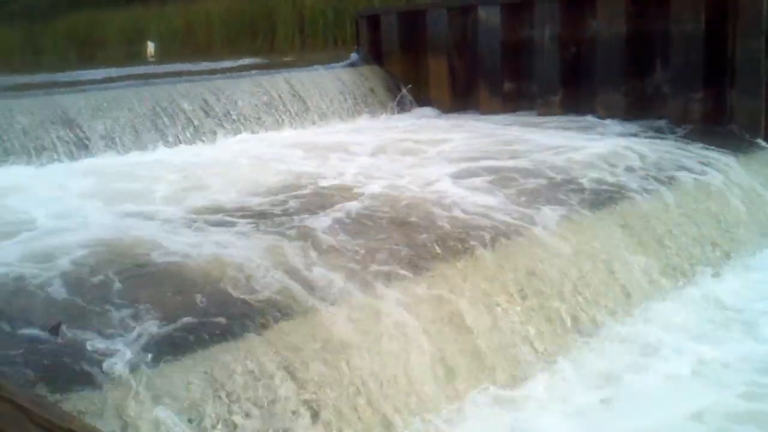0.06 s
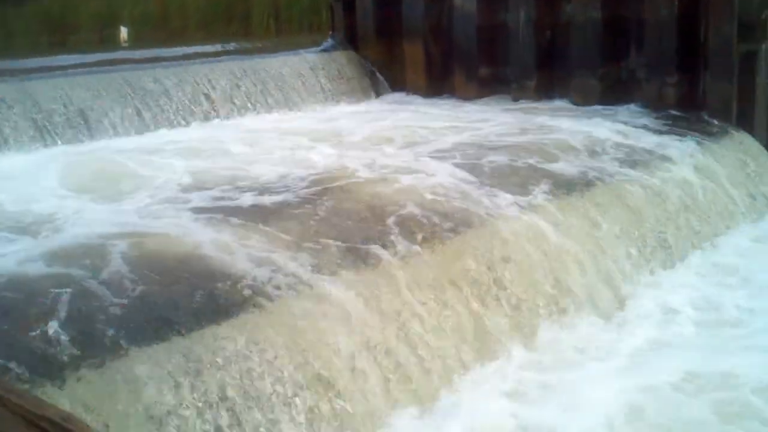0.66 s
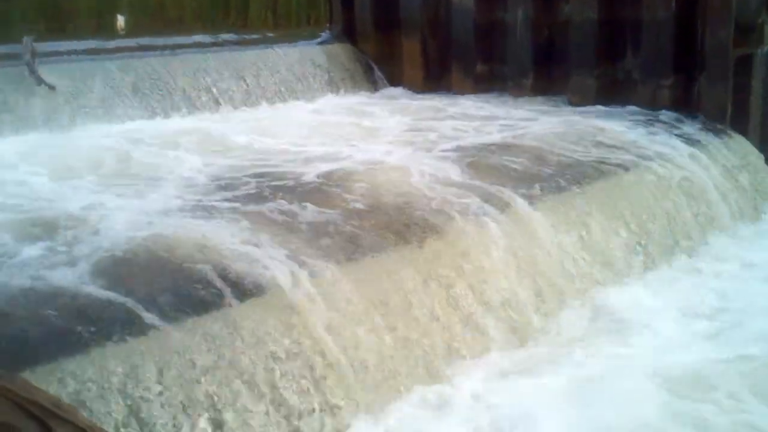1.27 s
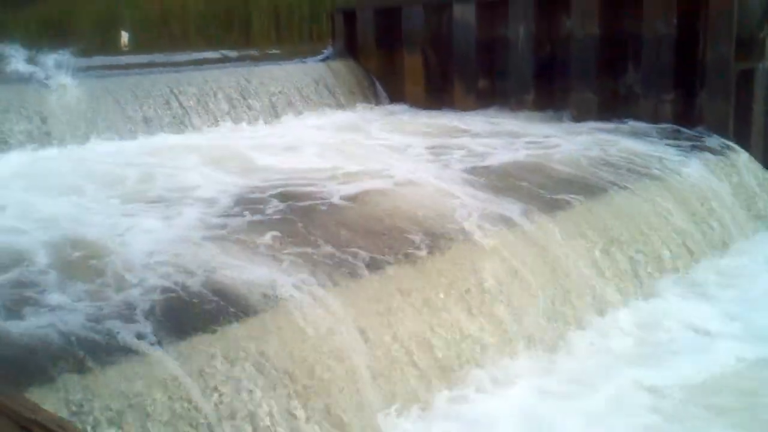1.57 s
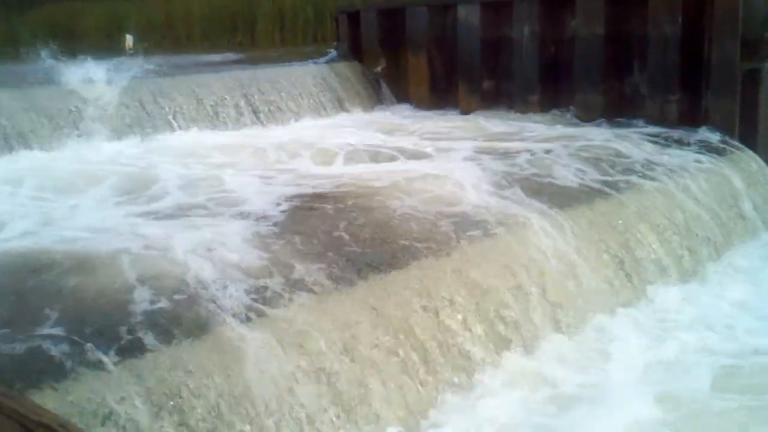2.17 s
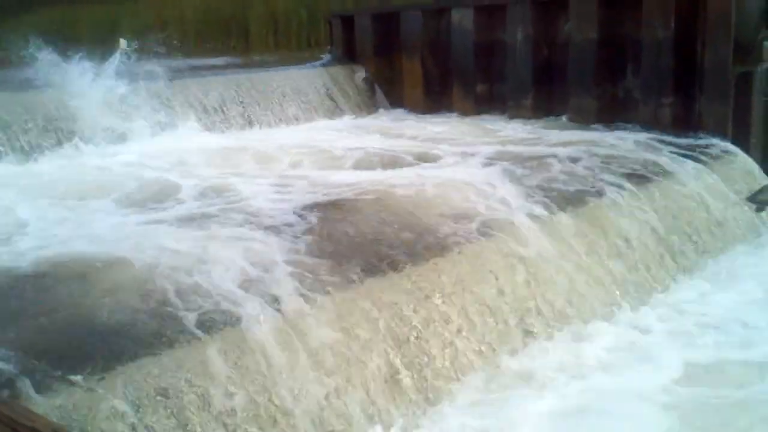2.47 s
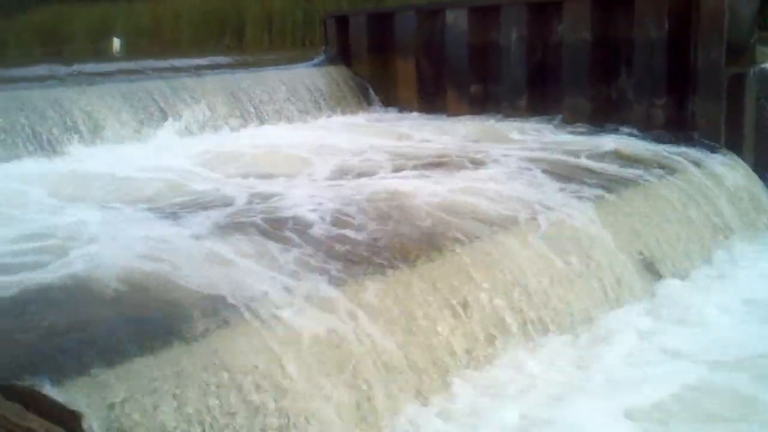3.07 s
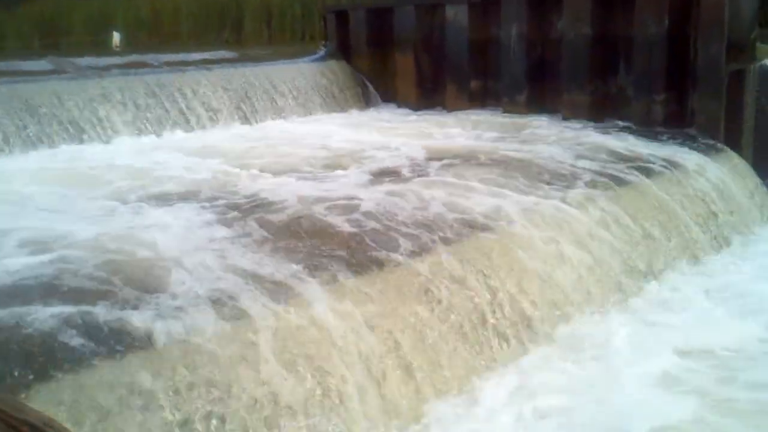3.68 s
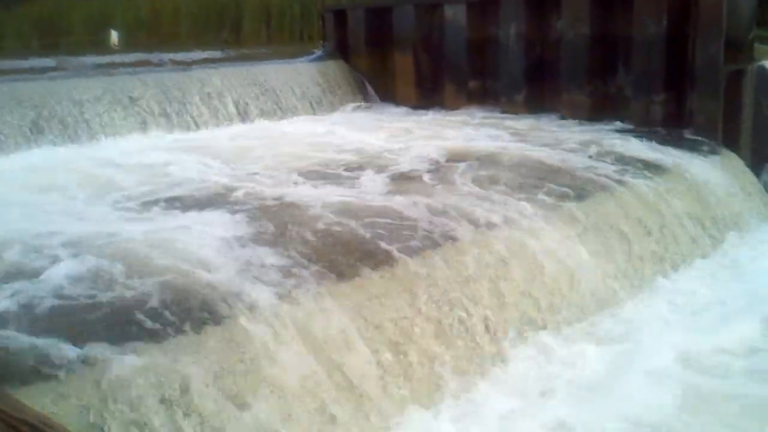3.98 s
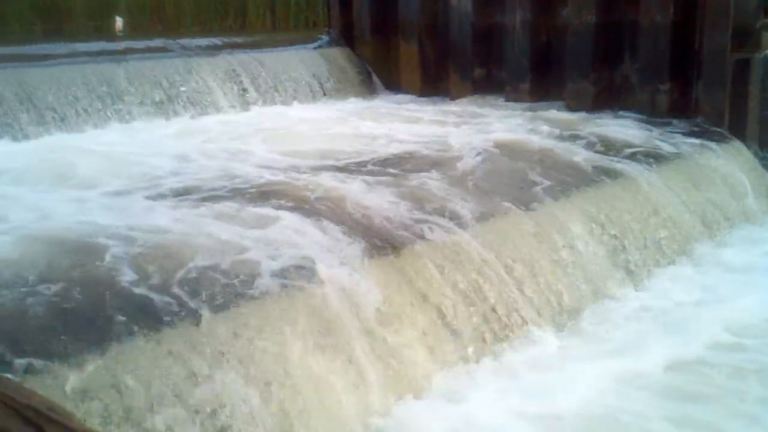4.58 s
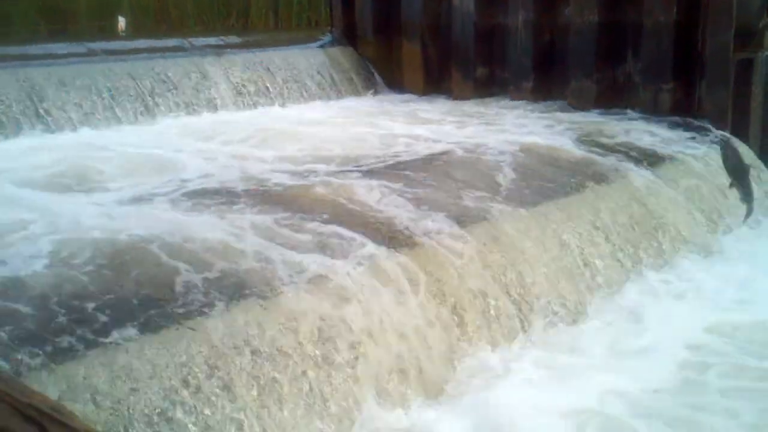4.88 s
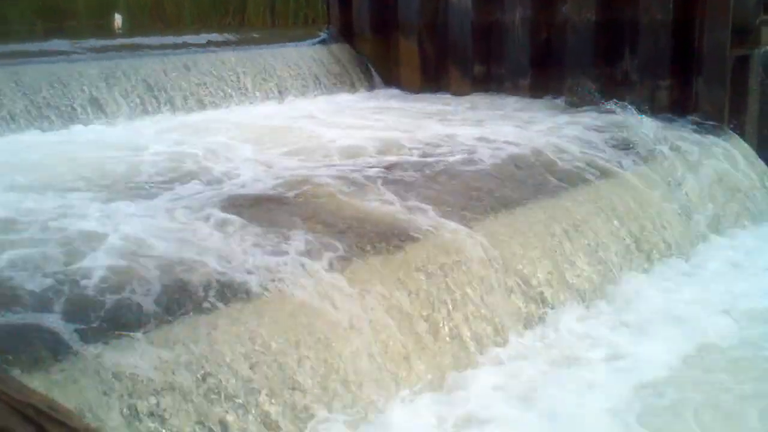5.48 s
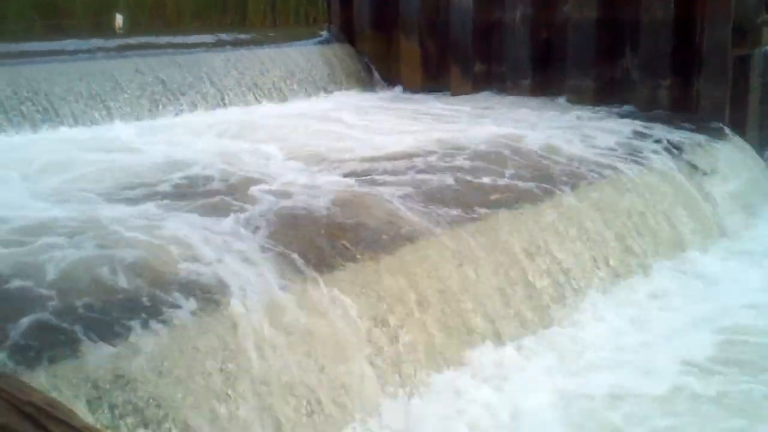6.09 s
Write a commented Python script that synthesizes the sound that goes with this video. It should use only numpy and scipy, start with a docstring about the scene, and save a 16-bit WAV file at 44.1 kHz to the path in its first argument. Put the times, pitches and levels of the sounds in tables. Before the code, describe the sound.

A river pours over a low stepped weir and plunges into a pool a few metres away. A deep, churning roar runs steadily throughout, with babbling bubbles and the hiss of spray above it. Low hollow gulps of air, a few faint plops and small wet slaps come and go inside the rush. The outdoor sound is wide and slightly hollow, picked up by a handheld microphone.

```python
"""White water below a low weir

A river pours over a stepped weir and plunges into a pool a few metres from the microphone.
Clouds of trapped air roar, single bubbles ring, spray fizzes and now and then a slab of water slaps down.
The microphone is a handheld camera's, and its stereo widener gives the rush a hollow colour."""
import sys
import numpy as np
from scipy import signal
from scipy.fft import rfft, irfft
from scipy.io import wavfile
from scipy.ndimage import uniform_filter1d, map_coordinates

SR = 44100
rng = np.random.default_rng(int(sys.argv[2]) if len(sys.argv) > 2 else 0)


def transcribe(u):
    """Save the signal u as a 16-bit wav file named by the first command-line argument.

    u: samples, shape (n,) or (channels, n), limited to [-1, 1]; the rate is SR.
    q: integer samples, one column per channel.
    """
    v = np.clip(np.atleast_2d(u).T, -1, 1)
    q = np.round(v * 32767).astype(np.int16)
    wavfile.write(sys.argv[1], SR, q)


N = 279153
TIME = np.arange(N) / SR
FREQ = np.maximum(np.arange(N // 2 + 1) * SR / N, 1)


# Spectrum of the plunge pool, a few metres off (frequency [Hz], relative level [dB])
POOL_SPECTRUM = [(25, -36.2), (50, -33), (80, -18.5), (120, -9.5), (165, -4.9), (215, -5), (280, -0.95),
                 (360, -1.57), (430, -4.5), (560, -9.5), (780, -16.5), (1100, -21), (1500, -24.5),
                 (2100, -24.5)]
# The boil under the fall, surging at its own pace (time [s], level [dB])
BOIL_SURGES = [(0, -0.6), (0.88, -0.5), (1.15, 1.1), (1.37, 1.0), (1.5, -1), (1.72, 1.2), (1.95, -1.2),
               (2.12, 0.8), (2.27, -2.0), (2.38, 1.2), (2.85, -0.5), (3.22, -2), (3.95, -0.7), (4.25, -0.1),
               (4.85, -0.4), (5.34, 0), (5.52, -2), (5.75, -0.5), (6.33, -0.5)]

def plunge():
    """Big pockets of air, driven under by the fall, boom and gurgle."""
    cloud = bubbles(199.3, 750.5, cycles=33.5, spread_db=1.5, rise=0.067, count=1600)
    water = churn(cloud, share_db=-4.5, flutter_db=0, flutter_hz=14)
    roar = spread(colour(water, gains(POOL_SPECTRUM) * below(700)))
    rumble = steady(colour(roar, below(200)), span_s=0.24)
    boil = steady(colour(roar, above(225)), span_s=0.12) * swell(BOIL_SURGES)
    return (rumble + boil) * undb(-0.52)


def splashing():
    """Smaller bubbles babble where the sheet of water breaks up."""
    cloud = bubbles(648.6, 2490, cycles=102, spread_db=3, rise=0.046, count=2300)
    water = churn(cloud, share_db=-6.5, flutter_db=0.5, flutter_hz=9.2)
    babble = spread(colour(water, gains(POOL_SPECTRUM) * above(663) * below(2320, order=24)))
    return steady(babble, span_s=0.2) * flow() * undb(-0.78)


# Spray and bursting foam across the weir (frequency [Hz], relative level [dB])
SPRAY_SPECTRUM = [(2900, -27), (3500, -31.5), (4400, -30.5), (5200, -31.5), (5850, -30), (6600, -31),
                  (7800, -30), (8600, -28.5), (10000, -27), (11000, -27.5), (12000, -31.5), (13600, -33)]
# Thrown spray coming down on the pool (time [s], length [s], patter rise [dB], fizz rise [dB])
SPRAY_SHOWERS = [(.58, 0.15, 1.5, 0.2), (0.793, .07, 4, 1), (1.82, .05, 1.5, 0.5), (2.08, .06, 0, 1.2),
                 (2.685, .08, 1.2, 0.5), (2.785, .04, 1.0, 0.3), (2.88, .09, 0.3, 0.5),
                 (3.52, .14, -0.5, 1), (3.675, 0.05, 2, 1.5), (4.172, .06, 0.6, 1.2), (4.577, .07, 1.7, 0),
                 (4.788, .05, 1, 0.9), (4.982, 0.044, 2, 1), (5.395, .04, -0.4, 2), (5.574, 0.036, 2, 0),
                 (5.69, .12, 0.2, 2), (6.1, .06, 1.5, 1.5)]

def spray(split_hz=9800):
    """Drops patter and foam fizzes, lifting with the showers; coarse and fine foam flutter apart."""
    drops = bubbles(2388, 5047, cycles=400, spread_db=2.8, rise=0.044, count=3600)
    foam = bubbles(5140, 14400, cycles=30, spread_db=2, rise=0.1, count=24000)
    hiss = gains(SPRAY_SPECTRUM) * above(2110, order=24)
    patter = colour(churn(drops, share_db=-4, flutter_db=0.52, flutter_hz=20), hiss * below(5680))
    fizz = patter_db = fizz_db = 0
    for cloud, band in ((foam, below(split_hz)), (np.roll(foam, N // 2, axis=1), above(split_hz))):
        froth = churn(cloud, share_db=-5, flutter_db=1, flutter_hz=23)
        fizz += colour(froth, hiss * above(6190) * band)
    for at, length, patter_rise, fizz_rise in SPRAY_SHOWERS:
        shower = np.exp(-(2 * (TIME - at) / length) ** 2)
        patter_db += patter_rise * shower
        fizz_db += fizz_rise * shower
    patter = steady(spread(patter), span_s=0.15) * undb(patter_db)
    fizz = steady(spread(fizz), span_s=0.14) * undb(fizz_db)
    return (patter + fizz) * flow() * undb(-0.56)


# Air gulped under the fall, straight ahead (time [s], relative level [dB], pitch [Hz])
AIR_GULPS = [(.08, -25, 307), (1.0, -19, 274), (1.12, -20, 421), (1.25, -26, 300), (1.335, -24, 425),
             (2.083, -21, 445), (2.796, -21.5, 347), (2.92, -23, 302), (3.37, -22, 412), (3.85, -26, 423),
             (4.18, -26, 426), (4.345, -21.5, 420), (4.385, -23, 273), (4.582, -31, 665), (5.005, -20, 318),
             (5.32, -21, 426), (5.735, -22, 414), (6.166, -24, 287)]

def gulps():
    """The biggest pockets of air ring low and hollow."""
    return undb(2) * rings(AIR_GULPS, attack_s=0.013, decay_s=0.029, rise_per_s=0.14, waver=0.013)


# Single bubbles close to the microphone, on the left (time [s], relative level [dB], pitch [Hz])
NEAR_PLOPS = [(1.091, -31, 2255), (1.752, -31, 1783), (2.361, -33, 2330), (2.675, -29, 2260),
              (3.55, -27.5, 1865)]

def plops():
    """Small bubbles ring high and short."""
    ringing = rings(NEAR_PLOPS, attack_s=0.004, decay_s=0.014, rise_per_s=0.27, waver=0.005)
    return undb(1.5) * ringing * np.array([[1], [0]])


# Slabs of water hitting the pool (time [s], relative level [dB], band centre [Hz])
POOL_SLAPS = [(.983, -34, 2180), (1.355, -38, 2300), (1.586, -35, 2390), (1.728, -35, 1890),
              (2.679, -33, 2180), (3.549, -33, 1950), (4.471, -38, 2150), (4.785, -39, 2450),
              (4.979, -35, 1800), (5.396, -36, 2150)]

def slaps(edge_ratio=1.185, attack_s=0.003, decay_s=0.013):
    """Each slab of water lands with a short wet burst of noise."""
    out = np.zeros((2, N))
    t = TIME[:SR // 5]
    shape = (1 - np.exp(-t / attack_s)) * np.exp(-t / decay_s)
    for start, db, hz in POOL_SLAPS:
        band = signal.butter(2, [hz / edge_ratio, hz * edge_ratio], "bandpass", fs=SR, output="sos")
        burst = unit(signal.sosfilt(band, rng.standard_normal((2, len(t)))))
        first = int(start * SR)
        out[:, first:first + len(t)] += undb(db + 3.5) * burst * shape / shape.max()
    return out


# The pool's hollow ring, centred behind the roar (time [s], relative level [dB])
RING_SWELLS = [(0, -14), (1.2, 0), (1.85, -2), (2.15, -3), (3.1, -7), (3.4, 6.5), (3.62, -3.5), (4.2, 2),
               (4.85, 0), (5.35, 6), (5.6, -4), (6.33, -9)]

def pool_ring(hz=430, width_hz=30, drift=0.01788):
    """Churning keeps a resonance of the pool ringing; its pitch wanders with the cloud of air."""
    ring = unit(colour(rng.standard_normal(N), peak(hz, width_hz)))
    speed = 1 + drift * walk(3.98)
    ring = map_coordinates(ring, [np.cumsum(speed)], order=1, mode="mirror")
    return steady(ring[None], span_s=0.23) * swell(RING_SWELLS) * undb(-33)


def thud(at_s=0.42, length_s=0.018):
    """One soft low thud."""
    rumble = unit(colour(rng.standard_normal((2, N)), below(60, order=6)))
    return undb(-41) * rumble * np.exp(-((TIME - at_s) / length_s) ** 2)


# The space between weir, wall and microphone (frequency [Hz], width [Hz], boost [dB])
SPACE_RESONANCES = [(510, 25, 3.5), (860, 50, 1.2), (1427, 270, 3.5), (1950, 190, 1.5), (3880, 230, 0.9),
                    (9800, 900, 0.15)]

def resonate(water):
    """The space lifts the water's sound mildly around each resonance."""
    boost_db = sum(db * peak(hz, width) for hz, width, db in SPACE_RESONANCES)
    return colour(water, undb(boost_db))


# The flow over the lip of the weir (time [s], level before scaling by depth [dB])
WEIR_FLOW = [(0.0, -1), (0.38, -1.0), (0.78, 0.4), (1.06, 0.5), (1.48, -0.1), (1.77, 0), (1.93, -0.5),
             (2.88, 1), (3.04, -1.0), (3.56, 0.4), (3.82, -0.9), (4.5, 0.85), (5.11, -0.5), (5.6, 0.4),
             (6.12, 0.0), (6.33, -1)]

def flow(depth=0.82):
    """Gain that swells and eases with the flow, about once a second."""
    return swell(WEIR_FLOW) ** depth


# Width of the water from where the microphone is (frequency [Hz], side against mid [dB])
STEREO_WIDTH = [(40, -10), (130, -19), (280, -17), (430, -13), (600, -5.5), (800, -2), (1100, -1.5),
                (1650, 6), (2050, 3.5), (2600, -3), (3400, 0.5), (6000, 0.1)]

def spread(water):
    """Lay two unrelated signals across the weir; the deep roar stays ahead."""
    mid, side = water[0], colour(water[1], gains(STEREO_WIDTH))
    return np.array([mid + side, mid - side])


def bubbles(lo_hz, hi_hz, cycles, spread_db, rise, count):
    """A stereo cloud of damped rings that glide up as the bubbles near the surface."""
    when, pitch, size, place, life = rng.random((count, 5)).T
    hz = lo_hz + (hi_hz - lo_hz) * pitch
    ring_s = cycles * (0.5 + life) / hz  # time to fade by 60 dB
    strength = undb(-spread_db * np.log(1 - 0.99 * size)) / np.sqrt(ring_s)
    t = np.arange(int(ring_s.max() * SR)) / SR
    age = t / ring_s[:, None]
    phase = 2 * np.pi * hz[:, None] * t * (1 + rise * age / 2)
    ringing = strength[:, None] * np.exp(-np.log(1000) * age) * np.sin(phase)
    index = ((when * N).astype(int)[:, None] + np.arange(len(t))) % N
    out = np.zeros((2, N))
    for channel, pan in enumerate((np.cos(np.pi * place), np.sin(np.pi * place))):
        out[channel] = np.bincount(index.ravel(), (ringing * pan[:, None]).ravel(), N)
    return unit(out) * np.sqrt(2 * (hi_hz - lo_hz) / SR)  # same power per Hz as unit white noise


def churn(cloud, share_db, flutter_db, flutter_hz):
    """Near bubbles stand out of a wash of far ones; the tearing sheet flutters both by flutter_db."""
    share = undb(share_db)
    water = (rng.standard_normal((2, N)) + share * cloud) / np.sqrt(1 + share ** 2)
    return water * undb(flutter_db * walk(flutter_hz))


def rings(table, attack_s, decay_s, rise_per_s, waver):
    """Each pocket of air rings briefly, wavering as it deforms and gliding up as it rises."""
    out = np.zeros(N + SR)
    t = TIME[:SR // 3]
    shape = (1 - np.exp(-t / attack_s)) * np.exp(-t / decay_s)
    for start, db, hz in table:
        wobble = np.interp(t, np.linspace(0, t[-1], 20), rng.standard_normal(20))
        pitch = hz * (1 + rise_per_s * t + waver * wobble)
        tone = np.sin(2 * np.pi * np.cumsum(pitch) / SR)
        first = int(start * SR)
        out[first:first + len(t)] += undb(db) * tone * shape / shape.max()
    return out[:N]


def steady(x, span_s):
    """Even out the slow swells of a random sound, leaving its grain."""
    power = uniform_filter1d(np.mean(x ** 2, axis=0), int(span_s * SR))
    return x / np.sqrt(power / np.mean(x ** 2))


def walk(hz):
    """Smooth random motion of rms 1, changing about hz times a second."""
    return unit(colour(rng.standard_normal(N), below(hz, order=6)))


def swell(curve):
    """Gain along a (time [s], level [dB]) curve."""
    when, db = np.transpose(curve)
    return undb(np.interp(TIME, when, db))


def gains(points):
    """Gain at every frequency from (frequency [Hz], level [dB]) points."""
    hz, db = np.transpose(points)
    return undb(np.interp(np.log(FREQ), np.log(hz), db))


def colour(x, gain):
    """Filter by a gain per frequency."""
    return irfft(rfft(x) * gain, N)


def above(hz, order=12):
    """Steep high-pass gain."""
    return 1 / np.sqrt(1 + (hz / FREQ) ** order)


def below(hz, order=12):
    """Steep low-pass gain."""
    return 1 / np.sqrt(1 + (FREQ / hz) ** order)


def peak(hz, width_hz):
    """Resonance curve of height 1."""
    return 1 / (1 + (2 * (FREQ - hz) / width_hz) ** 2)


def undb(db):
    """Decibels to gain."""
    return 10 ** (np.asarray(db) / 20)


def unit(x):
    """Scale to rms 1."""
    return x / np.sqrt(np.mean(x ** 2))


def scene():
    """The weir as it reaches the microphone, left and right."""
    rush = resonate(plunge() + pool_ring() + splashing() + spray())
    return rush + gulps() + plops() + slaps() + thud()


# What the camera's widener takes from the opposite channel (frequency [Hz], level [dB])
WIDENER_FEED = [(300, -3), (1300, -1.5), (2400, 0), (4100, 0), (4800, -11), (5500, -12), (13000, -19)]
# Slightly unequal colour of the two channels (frequency [Hz], left over right [dB])
CHANNEL_BALANCE = [(100, -0.5), (200, 1.1), (620, 1.5), (800, -1.1), (1250, -0.2), (1700, -2.2), (2400, 0),
                   (2750, 0), (2950, -0.9), (3400, 0.5), (4700, -1), (8500, 0.6), (12500, -0.4)]

def record(dry, delay_s=17 / SR, top_hz=13900):
    """The widener subtracts a delayed copy of the opposite channel, combing the sound; the top is cut."""
    delay = np.exp(-2j * np.pi * FREQ * delay_s)
    wide = dry - colour(dry[::-1], gains(WIDENER_FEED) * delay)
    lean = np.sqrt(gains(CHANNEL_BALANCE))
    top_cut = signal.ellip(12, 0.1, 80, top_hz, fs=SR, output="sos")
    return signal.sosfilt(top_cut, colour(wide, np.array([lean, 1 / lean])))


dry = scene()
out = record(dry)
transcribe(out)
```